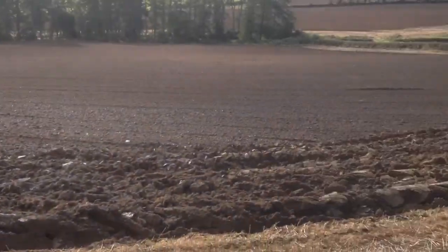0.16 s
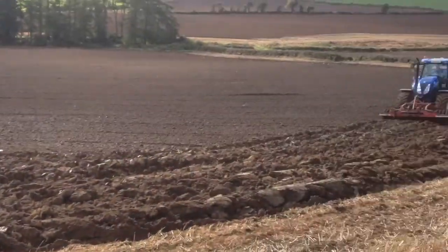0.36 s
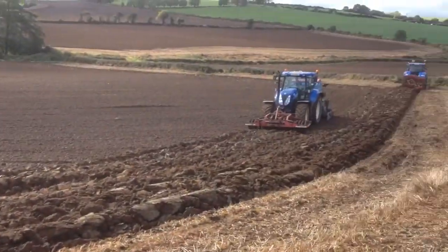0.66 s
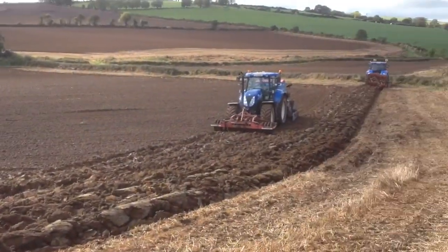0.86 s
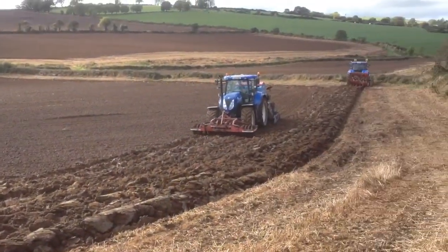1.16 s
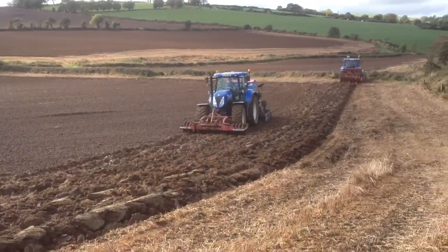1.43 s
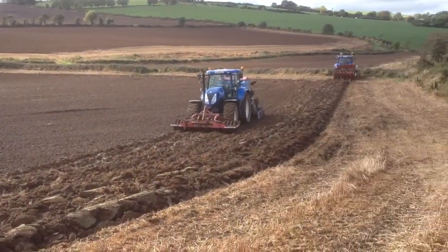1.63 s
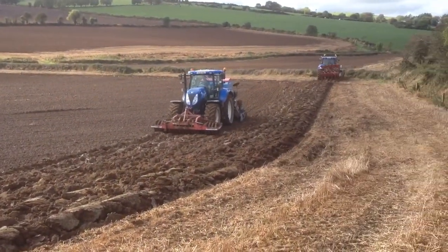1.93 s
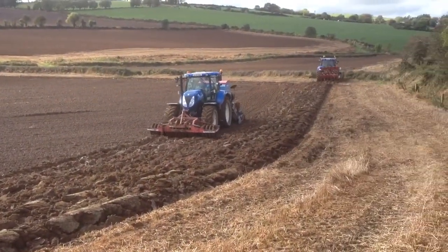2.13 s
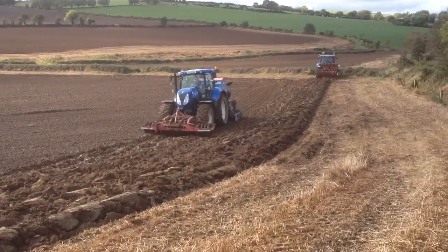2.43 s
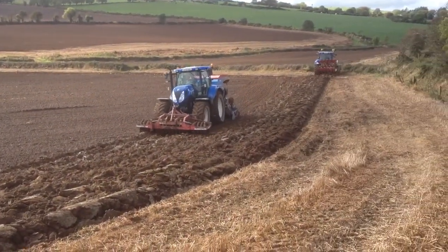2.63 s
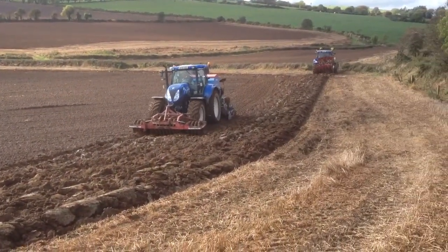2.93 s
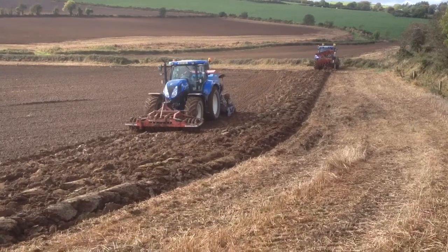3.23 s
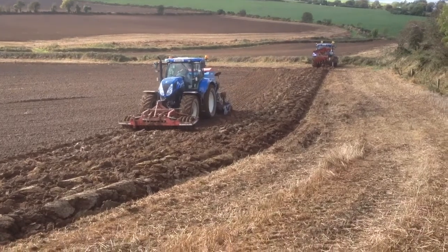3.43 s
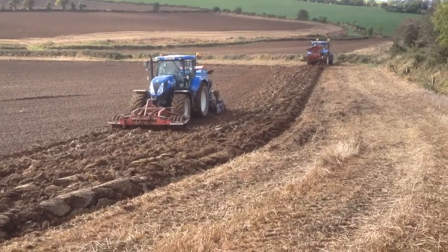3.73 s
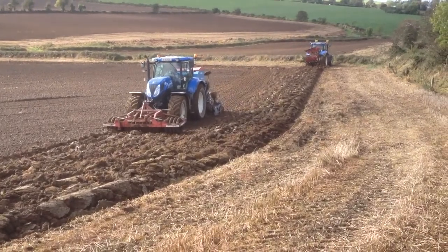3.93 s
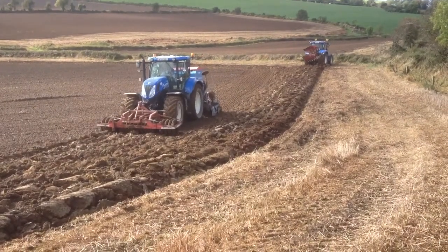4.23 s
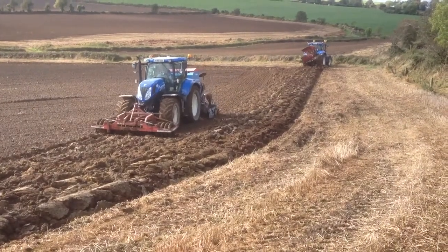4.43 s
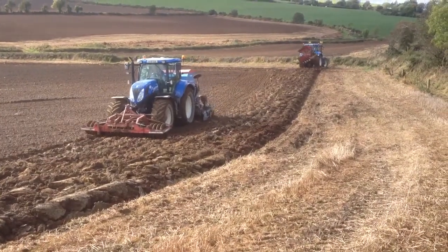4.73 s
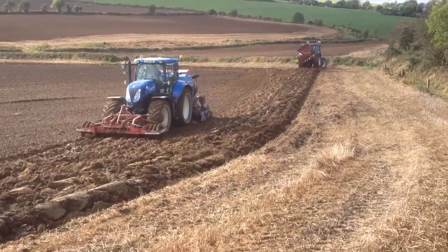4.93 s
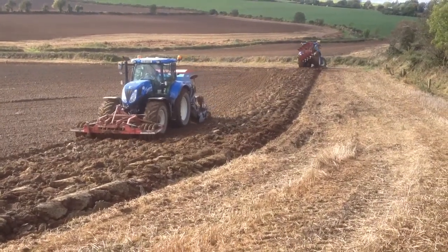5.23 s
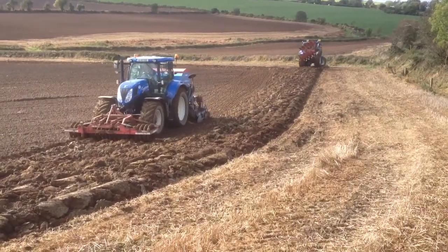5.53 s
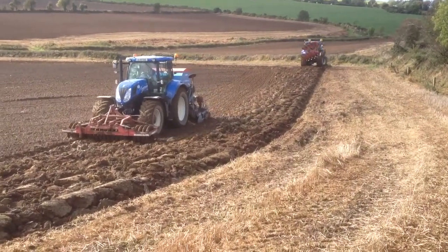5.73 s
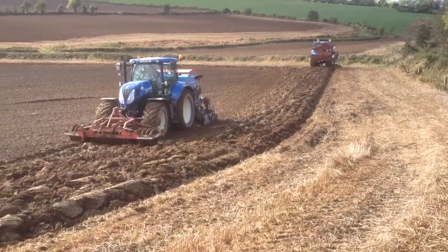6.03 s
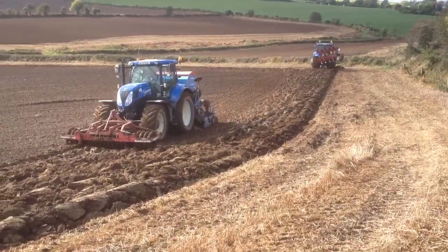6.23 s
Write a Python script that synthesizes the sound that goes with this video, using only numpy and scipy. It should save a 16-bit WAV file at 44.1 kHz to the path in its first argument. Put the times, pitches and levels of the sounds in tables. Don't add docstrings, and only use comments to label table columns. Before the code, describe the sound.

A steady tractor engine roar and faint steady whine come from across an open field, half covered by heavy, fluttering gusts on the microphone.

```python
import sys
import numpy as np
from scipy import signal
from scipy.fft import rfft, irfft, next_fast_len
from scipy.io import wavfile
from scipy.ndimage import uniform_filter1d, map_coordinates

SR = 44100
rng = np.random.default_rng(int(sys.argv[2]) if len(sys.argv) > 2 else 0)


def wrap_up_sound(samples):
    columns = np.atleast_2d(samples).T
    tamed = np.clip(columns, -1, 1)
    steps = np.round(tamed * 32767).astype(np.int16)
    wavfile.write(sys.argv[1], SR, steps)


def rack_gain(trim_db):
    fader = np.asarray(trim_db, float)
    return 10 ** (fader / 20)


N = 280917

# (frequency [Hz], density [dB per Hz])
HISS_SPECTRUM = [(1530, -29), (2600, -1.5), (3520, -4), (5340, -6), (9180, -14.5), (10600, -14.5),
                 (14700, -5), (15300, -6)]
# (frequency [Hz], density [dB per Hz])
SWING_SPECTRUM = [(8, -27.5), (25, -30), (40, -13.5), (60, -4.5), (85, -1), (110, 1), (150, -36)]
# (frequency [Hz], density [dB per Hz])
LARGE_EDDY_SPECTRUM = [(50, -39.5), (80, -14), (105, -5.5), (150, -1.5), (200, -0.5), (250, -6.5),
                       (300, -20), (380, -32.5)]
# (frequency [Hz], density [dB per Hz])
SMALL_EDDY_SPECTRUM = [(200, -18.5), (270, 5), (330, -0.5), (450, -5.5), (600, -12), (900, -27),
                       (1400, -47.5)]
# (time [s], level [dB])
STEADY_WIND = [(0.0, -39), (0.94, -36), (1.31, -37), (2.0, -38.5), (2.46, -33), (2.73, -34), (2.89, -33.5),
               (3.14, -38.5), (3.28, -35.5), (3.41, -36), (4.2, -35.5), (4.45, -36), (4.63, -34),
               (4.74, -33.5), (5.73, -37.5), (5.92, -35), (6.05, -33.5), (6.37, -29.5)]
# (peak time [s], half length [s], large eddy rise [dB], small eddy rise [dB])
SHORT_GUSTS = [(.63, .03, -5, 6), (.55, 0.094, 3, 0), (.73, .03, 7, -2), (.82, 0.0089, 8.5, -1),
               (.9, 0.054, 2.5, 2), (1.0, 0.075, 0.5, 5.5), (2.37, 0.028, -0.5, 8.5), (2.09, 0.029, 4, 4),
               (2.285, 0.03, 8.5, 11.5), (2.44, 0.021, 3.5, 3.5), (2.52, 0.046, 2, 4.5),
               (3.47, 0.022, 1, 10.5), (2.83, 0.069, 3, 5), (3.07, 0.029, 7, 4), (3.14, 0.033, 4.5, 6),
               (3.22, 0.044, 6.5, 11.5), (3.3, 0.016, 4.5, -2.5), (3.4, 0.038, 6, 7),
               (3.6, 0.016, 0.5, -3.5), (3.68, 0.093, 4.5, 8), (4.32, 0.027, 7.5, 3), (4.43, .04, 9, 6.5),
               (4.51, 0.058, 6, 9), (4.68, 0.074, 6, 6), (5.0, 0.041, 8, 5.5), (5.15, 0.026, 7, 6.5),
               (5.25, 0.025, -2, 5), (5.39, 0.072, 3, 4), (5.62, 0.042, 4.5, 4.5), (5.92, 0.061, 4, 5)]
CLOSING_GUSTS = [
    6.1,
    6.22,
    6.36,
]
# (time [s], peak level [dB], frequency [Hz])
STRONG_EDDIES = [(0.396, -23, 229), (0.717, -24, 132), (0.981, -21, 128), (1.075, -19, 150),
                 (2.089, -22.5, 131.6), (2.283, -26, 191), (2.343, -21.5, 130), (2.41, -20, 192),
                 (2.504, -21, 179), (2.655, -16.5, 189), (2.832, -13, 229), (3.138, -18.5, 229),
                 (3.223, -12.5, 216), (3.384, -18, 169), (3.465, -19, 230), (3.591, -17, 210.3),
                 (4.047, -24, 232), (4.41, -15, 191), (4.489, -14.5, 161), (4.653, -16.5, 182),
                 (4.739, -17.5, 185), (4.84, -19, 132), (4.938, -14, 197), (4.998, -23, 178),
                 (5.142, -17, 162), (5.233, -19, 185), (6.197, -15, 197), (6.227, -14.5, 170),
                 (6.253, -16.5, 191), (6.351, -14.5, 182)]
# (time [s], length [s], level [dB]); the notes split them into two scrapes
STRAP_RUBS = [
    (.012, .03, -59),
    (.077, .008, -45),
    (.087, .006, -48),
    (.095, .011, -45),
    (.121, .004, -44),
    (.128, .011, -46),
    (.141, .014, -56),
]
# (frequency [Hz], density [dB per Hz])
STRAP_SPECTRUM = [(350, -16), (600, -4), (1000, 0), (1300, -1), (1600, -3), (2000, -7), (2600, -19),
                  (3300, -20), (4100, -33), (6000, -55)]
# (time [s], peak level [dB])
STONE_TICKS = [
    (0.682, -58),
    (1.4017, -54),
    (2.7092, -53),
    (2.76, -46),
    (3.4515, -56),
    (3.9275, -53),
    (5.1037, -54),
    (5.9663, -55),
    (6.0015, -54),
]
# (frequency [Hz], level [dB])
TINE_MODES = [(1750, 15), (2500, 0.5), (2850, -13), (4700, -17.5)]
# (time [s], level [dB])
PUMP_LEVEL = [(0, -60.5), (.34, -63), (.55, -55.5), (1.1, -61.5), (1.55, -56), (1.75, -59), (2.25, -51),
              (2.55, -54), (3.1, -51), (3.3, -55.5), (3.46, -45.5), (3.6, -56), (4.1, -51.5), (4.35, -46.5),
              (4.65, -53), (5.15, -49.5), (5.4, -52.5), (6.37, -53)]
# (multiple [1], level [dB], flutter [dB])
PUMP_OVERTONES = [(3, -84, 3), (4, -81, 4)]
# (frequency [Hz], wander [Hz], level [dB])
WAVERING_TONES = [(1118, 9, -80), (1142, 15, -83), (1256, 11, -75.5), (880, 25, -68.5)]
# (time [s], level [dB])
ENGINE_LEVEL = [
    (0, -56),
    (1.4, -55),
    (2.3, -56),
    (3.35, -52.5),
    (3.9, -54),
    (4.5, -52.5),
    (5, -52),
    (5.4, -54.5),
    (6, -51.5),
    (6.37, -51.5),
]
# (frequency [Hz], density [dB per Hz])
EXHAUST_SPECTRUM = [(90, -13.5), (200, -2.5), (420, 1.5), (600, -5), (850, 0.5), (1050, -4), (1250, -9),
                    (1400, -14.5), (1800, -26.5)]
# (frequency [Hz], density [dB per Hz])
BLOCK_SPECTRUM = [(1200, -23), (1450, -3), (1800, 3), (2050, -3), (2400, -9.5), (3000, -20.5), (4000, -32)]


def unit(x):
    return x / np.sqrt(np.mean(x ** 2) + 1e-20)


def curves(rows):
    s, *cols = np.transpose(rows)
    return [np.interp(np.arange(N) / SR, s, c) for c in cols]


def wobble(rate):
    return map_coordinates(rng.standard_normal(int(N * rate / SR) + 4), [np.arange(N) * rate / SR])


def coloured(x, spectrum):
    m = next_fast_len(N + 8192)
    hz, db = np.transpose(spectrum)
    log_hz = np.log(np.fft.rfftfreq(m, 1 / SR) + 1)
    gain = rack_gain(np.interp(log_hz, np.log(hz), db, left=-120, right=-120))
    return unit(irfft(rfft(x, m) * gain, m)[:N])


def patchy(depth_db, bins, frames):
    z = signal.stft(rng.standard_normal(N + 2048), nperseg=1024)[2]
    field = uniform_filter1d(rng.standard_normal(z.shape), size=bins, axis=0)
    field = uniform_filter1d(field, size=frames, axis=1)
    return signal.istft(z * rack_gain(depth_db * unit(field)), nperseg=1024)[1][:N]


def even(x, seconds):
    span = int(seconds * SR)
    power = uniform_filter1d(uniform_filter1d(x ** 2, span), span)
    return unit(x / np.sqrt(np.abs(power) + 0.027))


def preamp_hiss():
    return rack_gain(-73) * coloured(rng.standard_normal(N), HISS_SPECTRUM)


def gusts():
    t = np.arange(N) / SR
    lead_s, lasts = 0.01, 1.43
    rows = SHORT_GUSTS + [(s, 0.063, 1.5, 1.5) for s in CLOSING_GUSTS]
    large_db = sum(db * np.exp(-((t - s) / half) ** 2) for s, half, db, _ in rows)
    small_db = sum(db * np.exp(-((t - s + lead_s) / (lasts * half)) ** 2) for s, half, _, db in rows)
    return large_db, small_db


def wind():
    steady_db, = curves(STEADY_WIND)
    large_rise_db, small_rise_db = gusts()
    large_db = steady_db + large_rise_db
    small_db = steady_db - 10.5 + small_rise_db + 1.5 * wobble(12)
    mean_db = uniform_filter1d(large_db, SR // 3)
    swings = coloured(rng.standard_normal(N), SWING_SPECTRUM)
    clumps = wobble(26)
    large = coloured(rng.standard_normal(N), LARGE_EDDY_SPECTRUM)
    large = even(rack_gain(1.8 * clumps) * large, 0.05)
    small = even(coloured(rng.standard_normal(N), SMALL_EDDY_SPECTRUM), 0.064)
    small = unit(rack_gain(wobble(40) + clumps) * small)
    swing_db = 0.64 * (mean_db + 28.5) - 49.0
    return rack_gain(swing_db) * swings + rack_gain(large_db - 0.78) * large + rack_gain(small_db) * small


def thumps():
    out, t = np.zeros(N + SR), np.arange(SR // 12) / SR
    rough = coloured(rng.standard_normal(N), SMALL_EDDY_SPECTRUM[3:])
    swell = t / 0.0071 * np.exp(1 - t / 0.0059)
    for s, db, hz in STRONG_EDDIES:
        start = round(s * SR)
        swing = np.sin(2 * np.pi * hz * t + rng.uniform(0, 2 * np.pi))
        out[start:][:len(t)] += rack_gain(db - 5.5) * swell * swing
        edge_db = -47 + 0.59 * (db + 21.5)
        out[start:N][:len(t)] += rack_gain(edge_db) * (swell ** 2)[:N - start] * rough[start:][:len(t)]
    vent = signal.butter(2, 70, "high", fs=SR, output="sos")
    return signal.sosfilt(vent, out[:N])


def strap():
    t = np.arange(N) / SR
    grit = coloured(rng.standard_normal(N) * rack_gain(0.97 * wobble(500)), STRAP_SPECTRUM)
    stroke = np.zeros(N)
    for s, length_s, db in STRAP_RUBS:
        onset = np.clip((t - s) / 0.0011, 0, 1)
        stroke += rack_gain(db) * onset * np.exp(-(np.maximum(t - s, 0) / abs(length_s)) ** 2)
    return grit * stroke


def clods():
    out, t = np.zeros(N + SR), np.arange(SR // 20) / SR
    for s, db in STONE_TICKS:
        ring = np.zeros(len(t))
        for hz, level_db in TINE_MODES:
            strength = rack_gain(level_db + rng.normal(0, 2.9))
            ring += strength * np.sin(2 * np.pi * hz * rng.normal(1, 0.021) * t)
        grit = 1 + 0.8 * map_coordinates(rng.standard_normal(60), [t * 900])
        decay = rack_gain(db - 13.5 - 60 * t / 0.035)
        out[round(s * SR):][:len(t)] += decay * (1 - np.exp(-t / 0.0015)) * ring * grit
    return out[:N]


def whine():
    db, = curves(PUMP_LEVEL)
    hz = 494.4 - 0.3 * np.maximum(np.arange(N) / SR - 3.2, 0)
    phase = 2 * np.pi * np.cumsum(hz) / SR + 0.38 * wobble(6)
    tone = rack_gain(db + 2.5 + 0.62 * wobble(8.1)) * np.sin(phase)
    octave_db = -62.5 + 0.1 * (db - db.mean()) + 1.2 * wobble(15) + 1.7 * wobble(3.6)
    tone += rack_gain(octave_db) * np.sin(2 * phase)
    for multiple, level_db, flutter_db in PUMP_OVERTONES:
        tone += rack_gain(level_db + flutter_db * wobble(8)) * np.sin(round(multiple) * phase)
    for line_hz, wander_hz, level_db in WAVERING_TONES:
        gain = rack_gain(level_db + 2.9 * wobble(3.1))
        line_turns = np.cumsum(line_hz + 0.4 * wander_hz * wobble(4)) / SR
        tone += gain * np.sin(2 * np.pi * line_turns)
    return np.sqrt(2) * tone


def engine():
    exhaust_db, = curves(ENGINE_LEVEL)
    block_db = -67.5 + 0.8 * (exhaust_db - exhaust_db.mean())
    firing_hz = 105.6 * (1 + 0.003 * wobble(2.5))
    firings = np.cumsum(firing_hz) / SR
    fired = np.diff(np.floor(firings), prepend=0)
    cylinder_db = np.array([-7.0, -1.5, 4, -13.5, 2.0, -0.5])[firings.astype(int) % 6]
    pulses = unit(fired * rack_gain(cylinder_db + 2.5 * rng.standard_normal(N)))
    puffs = 1 + 0.038 * np.cos(2 * np.pi * firings)
    shimmer = wobble(6.2)
    exhaust = 0.22 * pulses + puffs * patchy(1.2, bins=3, frames=14)
    exhaust = coloured(exhaust, EXHAUST_SPECTRUM)
    block = 0.12 * pulses + puffs * patchy(1.0, bins=7, frames=8)
    block = coloured(block, BLOCK_SPECTRUM)
    return rack_gain(exhaust_db + 4.0 + 0.8 * shimmer) * exhaust + rack_gain(block_db + 1.5 + 0.27 * shimmer) * block


def scene():
    return (wind() + thumps() + strap() + clods() + whine() + engine())[None]


def band_limit(x):
    return signal.sosfilt(signal.butter(12, 15970, fs=SR, output="sos"), x)


def record(dry):
    wet = dry + preamp_hiss()
    m = next_fast_len(N + 8192)
    passed = np.fft.rfftfreq(m, 1 / SR) < 15345
    mix = irfft(rfft(wet, m) * passed, m)[:, :N]
    return band_limit(mix)


dry = scene()
out = record(dry)
wrap_up_sound(out)
```